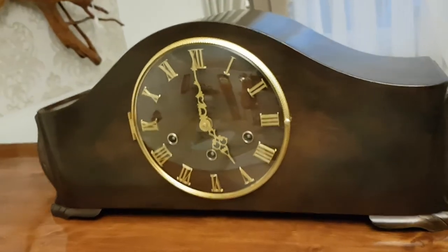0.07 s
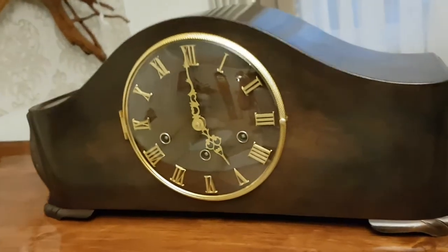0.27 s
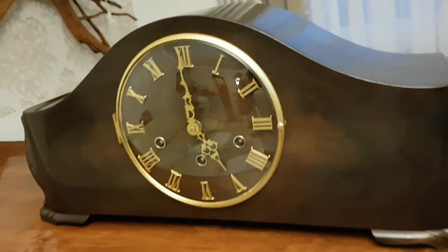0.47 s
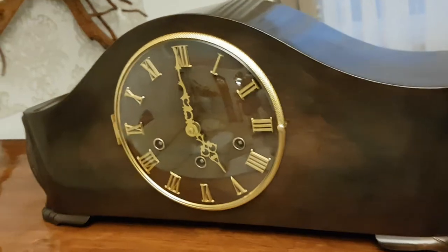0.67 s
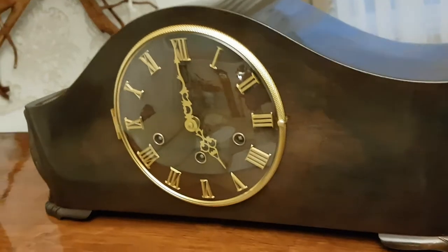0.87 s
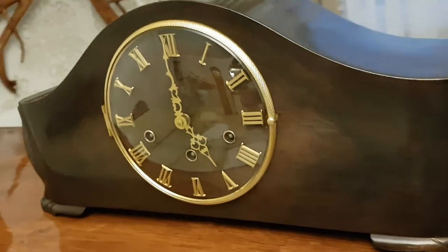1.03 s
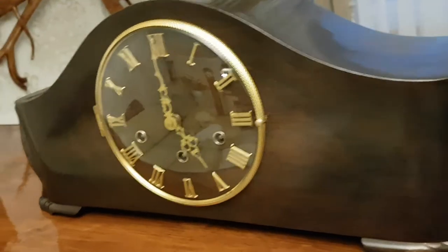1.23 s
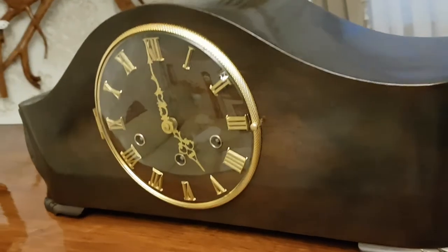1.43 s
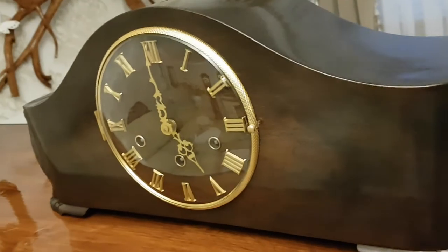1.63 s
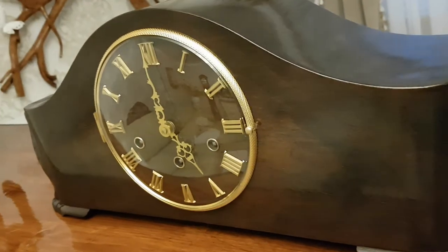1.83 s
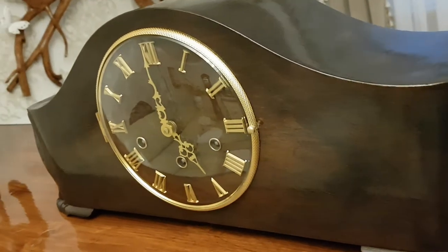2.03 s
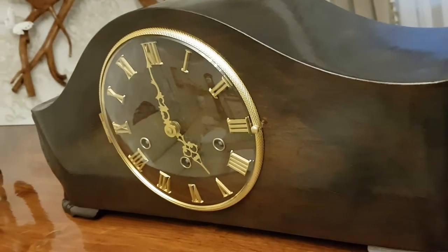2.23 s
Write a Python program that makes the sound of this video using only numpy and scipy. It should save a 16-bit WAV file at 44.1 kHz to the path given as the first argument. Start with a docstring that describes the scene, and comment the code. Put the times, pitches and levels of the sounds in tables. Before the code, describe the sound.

A mantel clock ticks softly in a small, quiet room: woody, ringing ticks at about 0.25, 0.89, 1.52 and 2.15 seconds alternate with tocks at 0.61, 1.25 and 1.88, slightly uneven. At 0.2 a sharp, far louder knock strikes the hand-held microphone's left side, with a duller bump at 0.25. A light wood tap at 0.79, soft low bumps, faint rustles, rumble and hiss.

```python
"""A wooden mantel clock ticks slightly out of beat in a quiet room: ringing case modes under a bright clatter.
Around it the hand-held recorder is knocked once, sharply, by its left microphone, and bumped softly as it
moves: short pulses with a low sway. A light tap on wood nearby is one pulse in the room; faint rustles are
swells of filtered noise. A few tiny bright snaps sound too, the first on top of the second knock. Steady noise
and hiss and a handling rumble lie underneath."""
import sys
import numpy as np
from scipy import signal
from scipy.fft import rfft, irfft, next_fast_len
from scipy.io import wavfile

SR = 44100
rng = np.random.default_rng(int(sys.argv[2]) if len(sys.argv) > 2 else 0)


def store_pcm(level_fs):
    """Save levels as 16-bit WAV."""
    pcm = np.round(np.clip(level_fs, -1, 1) * 32767).astype(np.int16)
    wavfile.write(sys.argv[1], SR, np.atleast_2d(pcm).T)


N = 101429  # length in samples

# ringing modes of the clock's case and movement
# columns: pitch_hz, tick_db, tock_db (relative levels), t60_s
CASE_MODES = [(776, -3.5, -2.5, 0.18), (1038, -2, 1.5, 0.09), (1116, 2, -5, .2), (1204, 2, 10, 0.066),
              (1383, -12, -22, 0.11), (1522, -0.5, -37, 0.16), (1657, 2, -2.5, 0.14),
              (2040, -11, -6.5, 0.12), (2201, 3, 3.5, 0.072), (2275, 11.5, -1, 0.03), (2947, -29, -4, 0.15),
              (3186, -1.5, -9, 0.062), (3473, -17, 10, 0.022)]


def amp(db):
    """Decibels to gain."""
    return 10 ** (np.asarray(db) / 20)


def unit(x):
    """Scale to rms 1."""
    return x / np.sqrt(np.mean(x ** 2) + 1e-20)


def decay(t, t60_s):
    """Exponential fade that falls 60 dB in t60_s."""
    return np.exp(-np.log(1000) * t / t60_s)


def along(points, hz):
    """Read (Hz, value) points on a log frequency axis."""
    point_hz, value = np.transpose(points)
    return np.interp(np.log(hz + 1), np.log(point_hz + 1), value)


def spectrum(points):
    """Turn (Hz, dB) points into a gain that depends on frequency."""
    return lambda hz: amp(along(points, hz))


def dull(hz, edge_hz):
    """Gain of a two-pole low-pass."""
    return 1 / np.sqrt(1 + (hz / edge_hz) ** 4)


def filtered(x, gain):
    """Multiply the spectrum of x by a gain that depends on frequency."""
    n = x.shape[-1]
    padded = next_fast_len(n + 8192)
    hz = np.fft.rfftfreq(padded, 1 / SR)
    return irfft(rfft(x, padded) * gain(hz), padded)[..., :n]


def noise(gain, size, alike=0):
    """Coloured stereo noise of rms 1, with a share of its power common to both sides."""
    white = rng.standard_normal((3, size))
    share = np.clip(alike, 0, 1)
    stereo = np.sqrt(1 - share) * white[:2] + np.sqrt(share) * white[2]
    return unit(filtered(stereo, gain))


def impulse(gain, size=8192):
    """The causal minimum-phase pulse, of peak 1, that has this spectrum."""
    hz = np.fft.rfftfreq(size, 1 / SR)
    cepstrum = irfft(np.log(np.maximum(gain(hz), 1e-6)))
    # folding the cepstrum onto positive time makes the pulse start at once
    cepstrum[1:size // 2] *= 2
    cepstrum[size // 2 + 1:] = 0
    pulse = irfft(np.exp(rfft(cepstrum)))[:size // 2]
    return pulse / np.abs(pulse).max()


def add(track, start_s, sound):
    """Mix a sound into the track at start_s."""
    first = max(round(start_s * SR), 0)
    part = track[..., first:][..., :sound.shape[-1]]
    part += sound[..., :part.shape[-1]]


def in_room(x, wet_db):
    """A stereo sound plus a fresh room tail: noise that decays at its own rate in each band."""
    # room decay; columns: band_hz, t60_s
    room_decay = [(150, 0.067), (1000, 0.14), (3000, 0.18), (10000, 0.067)]
    hz, t, bands = signal.stft(rng.standard_normal((2, SR // 2)), SR, nperseg=256)
    fade = decay(t, along(room_decay, hz)[:, None])
    tail = signal.istft(bands * fade, SR, nperseg=256)[1]
    tail = tail / np.linalg.norm(tail[0])
    out = amp(wet_db) * signal.fftconvolve(x, tail, axes=1)
    add(out, 0, x)
    return out


def background():
    """Steady room noise and hiss, and the wavering low rumble of the moving hand."""
    # handling rumble over time; columns: time_s, level_db
    handling = [(0, -66), (.29, -64), (.36, -77), (.62, -69), (.69, -60.5), (.79, -69), (.9, -62.5),
                (.97, -74), (1.14, -68), (1.25, -59), (1.34, -66), (1.42, -68), (1.58, -69), (1.68, -65),
                (1.83, -66), (1.96, -74), (2.08, -81), (2.15, -64), (2.3, -65)]
    # colour of the rumble; columns: band_hz, density_db (per Hz, relative)
    rumble_colour = [(20, -29), (38, -22), (55, 6), (75, -1), (140, -7.5), (260, -13), (600, -26),
                     (1500, -59.5)]
    # colour of room noise and hiss; columns: band_hz, density_db (per Hz, relative)
    air_colour = [(20, -17), (38, -19), (55, -6), (125, -12.5), (250, -11), (500, -17), (1000, -20),
                  (2000, -23), (3200, -27.5), (5000, -33), (7500, -35.5), (10000, -37.5), (13000, -32),
                  (15700, -29.5)]
    air_db, air_alike = -66.5, 0.049  # rms level; share of power common to both sides
    hand_db = np.interp(np.arange(N) / SR, *np.transpose(handling))
    rumble = amp(hand_db) * noise(spectrum(rumble_colour), N, alike=.1)
    air = amp(air_db) * noise(spectrum(air_colour), N, alike=air_alike)
    return rumble + air


def rustles():
    """Brief swells of rubbing in the room, as filtered noise, and a few tiny bright snaps; the first snap rides
    on the second knock by the left microphone."""
    # soft swells; columns: crest_s, half_length_s, level_db, dull_above_hz
    swells = [(-0.018, 0.059, -62, 3780), (0.373, 0.048, -67, 2800), (0.693, 0.031, -62, 4700),
              (0.848, 0.078, -69.5, 5500), (1.242, 0.04, -66.5, 3500), (1.372, 0.032, -62.5, 2310),
              (1.6, 0.076, -69, 3700)]
    # colour of the rubbing; columns: band_hz, density_db (per Hz, relative)
    rub_colour = [(200, -13), (600, -3), (1270, -4), (1365, 1.5), (1460, -7.5), (1750, -4), (2000, 0),
                  (2350, -4.5), (2800, -7.5), (4000, -11), (4800, -12.5), (6500, -19), (7300, -10),
                  (9000, -11), (14000, -11)]
    # snaps, the first on top of the second knock; columns: start_s, level_db, left_right_db
    snaps = [(0.2493, -54.5, 8), (1.366, -58, -12), (2.227, -54.5, -16)]
    # colour of a snap; columns: band_hz, level_db (relative)
    snap_colour = [(2500, -34), (5500, 6), (7500, 1), (11000, -2), (15500, -4)]
    out, t = np.zeros((2, N)), np.arange(N) / SR
    for crest_s, half_s, level_db, edge_hz in swells:
        swell = np.exp(-.5 * ((t - crest_s) / half_s) ** 2)
        rub = noise(lambda hz: spectrum(rub_colour)(hz) * dull(hz, edge_hz), N)
        out += amp(level_db) * swell * rub
    for start_s, level_db, pan_db in snaps:
        side_db = level_db + pan_db * np.array([[.5], [-.5]])
        add(out, start_s, amp(side_db) * impulse(spectrum(snap_colour)))
    return out


def tap():
    """A light tap on wood nearby: the same pulse at both microphones, with a strong room tail."""
    # colour of the tap; columns: band_hz, level_db (relative)
    tap_colour = [(40, -34), (100, -3), (175, 17), (280, -8), (450, 3), (850, 0.5), (1300, -5), (2600, -10),
                  (4500, -25), (6500, -26), (12000, -56)]
    start_s, level_db, room_db = 0.7855, -45, 5
    out = np.zeros((2, N))
    pulse = impulse(spectrum(tap_colour))
    add(out, start_s, amp(level_db) * in_room(np.array([pulse, pulse]), room_db))
    return out


def bumps():
    """Each contact is one dead push and a short sway of the recorder, weaker and duller at the far microphone."""
    # knocks and bumps on the recorder
    # columns: start_s, level_db, dull_above_hz, left_right_db (positive is nearer the left)
    contacts = [(0.028, -43.5, 270, -18), (0.094, -55, 217, -2), (0.2021, -7, 6200, 25),
                (0.2488, -20.5, 830, 22.5), (0.658, -46, 107, -27), (0.688, -62, 81, -24),
                (0.739, -47.5, 140, 35), (0.938, -50.5, 300, -14), (1.1655, -42.5, 235, 25),
                (1.211, -45, 246, -24), (1.235, -48, 81, -25), (1.269, -73, 90, -24),
                (1.322, -55.5, 78.6, -6), (1.477, -54.5, 119, 20), (1.622, -46.5, 440, 18),
                (1.674, -52.5, 89, -13), (1.700, -53, 160, 20), (1.77, -54.5, 68.4, 17),
                (1.819, -63, 60, -7), (1.9114, -43, 216, 36), (2.007, -51.5, 397, -19),
                (2.111, -47.5, 66.4, -18), (2.123, -51.5, 128, -9)]
    # response of the recorder's body; columns: band_hz, level_db (relative)
    shell = [(30, -58.5), (50, -25.5), (75, -5), (115, 4), (160, 3.5), (230, 5.5), (350, 3), (520, 3.5),
             (760, -3.5), (1100, -4), (2000, -13), (3200, -17), (5000, -33.5), (7500, -44.5),
             (15000, -27.5)]
    sway_hz, sway_db, sway_t60_s, sway_rise_s = 110.3, -12, 0.032, 0.0032  # short low ring
    far_dull_hz, far_lag_s = 2200, 0.00025  # what the farther microphone gets
    room_db = -36
    out = np.zeros((2, N))
    for start_s, level_db, edge_hz, pan_db in contacts:
        push = lambda hz: spectrum(shell)(hz) * dull(hz, edge_hz)
        near = impulse(push)
        t = np.arange(len(near)) / SR
        rise = 1 - np.exp(-(t / sway_rise_s) ** 2)
        sway = np.sin(2 * np.pi * sway_hz * t) * decay(t, sway_t60_s) * rise
        near = near + amp(sway_db) * sway
        far_push = impulse(lambda hz: push(hz) * dull(hz, far_dull_hz))
        far = np.zeros_like(near)
        add(far, far_lag_s, amp(-abs(pan_db)) * far_push)
        sides = np.array([near, far] if pan_db > 0 else [far, near])
        # the push first swings the signal negative
        add(out, start_s, -amp(level_db) * in_room(sides, room_db))
    return out


def beats(strokes, mode_db, clatter_colour, clatter_t60_s):
    """A tooth lands on a pallet: the brass clatters and the case rings on."""
    attack_s, ring_db, clatter_db, room_db = 0.0013, -1, 2, -4.5
    ring_body_s = 0.012  # the ring holds the energy of an rms-1 tone this long
    mode_scatter_db = 1  # from beat to beat
    mode_spread_rad = 0.71  # phase scatter between the microphones
    out, t = np.zeros((2, N)), np.arange(SR // 3) / SR
    mode_hz, _, _, mode_t60_s = np.transpose(CASE_MODES)
    count = len(mode_hz)
    for start_s, level_db in strokes:
        gains = amp(mode_db + mode_scatter_db * rng.standard_normal(count))
        phase = rng.uniform(0, 2 * np.pi, count) + mode_spread_rad * rng.standard_normal((2, count))
        tones = np.sin(2 * np.pi * mode_hz[:, None] * t + phase[..., None])
        modes = tones * decay(t, mode_t60_s[:, None])
        ring = (gains[:, None] * modes).sum(axis=1)
        energy = np.sum(ring ** 2, axis=1, keepdims=True)
        ring = ring / np.sqrt(energy / (ring_body_s * SR))
        clatter = noise(spectrum(clatter_colour), len(t)) * decay(t, clatter_t60_s)
        attack = 1 - np.exp(-t / attack_s)
        beat = (amp(ring_db) * ring + amp(clatter_db) * clatter) * attack
        add(out, start_s, amp(level_db) * in_room(beat, room_db))
    return out


def clock():
    """The escapement's two pallets, tick and tock, excite the same modes in different measure."""
    # beats on each pallet; columns: start_s, level_db
    tick_strokes = [(0.2532, -52.5), (0.8872, -54.5), (1.5205, -52.5), (2.1538, -54)]
    tock_strokes = [(0.6148, -54), (1.2488, -55), (1.8815, -55.5)]
    # dense clatter between the modes; columns: band_hz, density_db (per Hz, relative)
    tick_clatter = [(150, -18), (500, 6), (1100, 11), (2250, 9), (2600, -10), (3400, 4), (4100, -9),
                    (8000, -16.5), (14000, -30)]
    tock_clatter = [(150, -47), (500, -10), (1100, 3.5), (1500, -6.5), (2250, -5), (2600, -20), (3600, -10),
                    (4800, -12.5), (6500, -26), (14000, -34)]
    _, tick_db, tock_db, _ = np.transpose(CASE_MODES)
    ticks = beats(tick_strokes, tick_db, tick_clatter, clatter_t60_s=0.067)
    tocks = beats(tock_strokes, tock_db, tock_clatter, clatter_t60_s=0.051)
    return ticks + tocks


def scene():
    """Everything at the two microphones."""
    return background() + rustles() + tap() + bumps() + clock()


def record(dry):
    """The recorder keeps nothing above its band limit."""
    top_hz = 15900
    return filtered(dry, lambda hz: hz < top_hz)


dry = scene()
out = record(dry)
store_pcm(out)
```